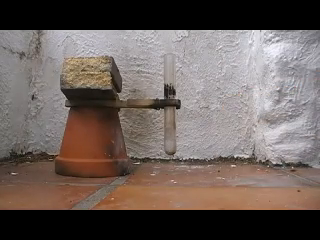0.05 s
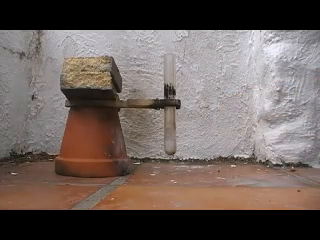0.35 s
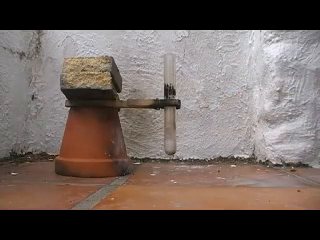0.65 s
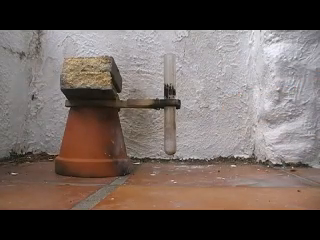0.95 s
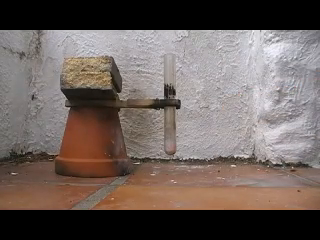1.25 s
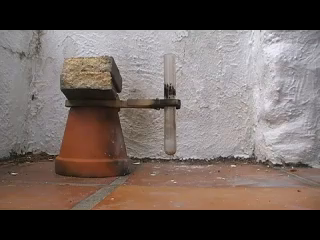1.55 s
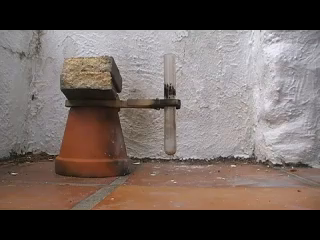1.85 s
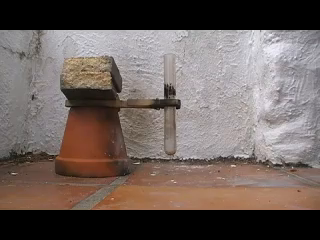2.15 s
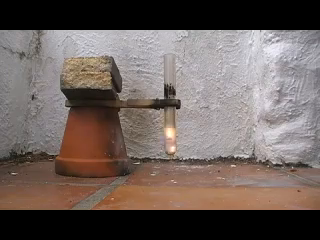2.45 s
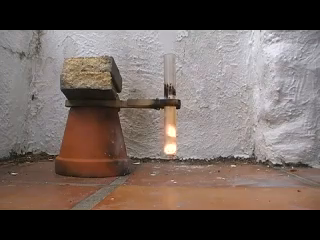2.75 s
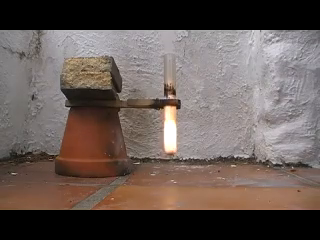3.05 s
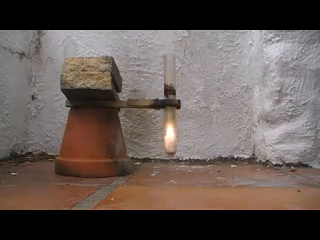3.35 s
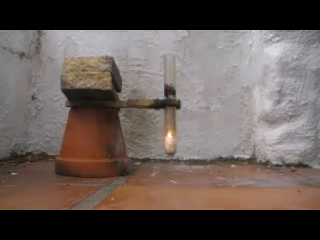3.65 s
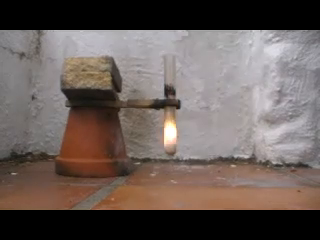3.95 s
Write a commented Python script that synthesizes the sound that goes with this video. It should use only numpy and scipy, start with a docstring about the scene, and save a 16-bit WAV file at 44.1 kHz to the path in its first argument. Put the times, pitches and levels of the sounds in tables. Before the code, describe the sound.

A chemical mixture fizzes in a glass tube from the start, with scattered dry pops and a hollow ringing tone. At about 2.3 seconds it ignites with sharp gusts and low thumps, becoming a hissing, crackling roar that climbs in pitch until about 3.2 seconds. It then sputters in rapid spits, dropping in pitch, up to the end at 4 seconds. The room hums very faintly underneath.

```python
"""Chemical fire in a glass tube

A mixture fizzes and pops in an upright tube, catches fire, roars, and sputters as it burns down.
All of it but the low thumps rings through the tube's air column, whose pitch rises with the heat
of the gas. A wall and a tiled floor stand close behind and below; the room hums faintly."""
import sys
import numpy as np
from scipy import signal
from scipy.fft import rfft, irfft
from scipy.io import wavfile
from scipy.ndimage import uniform_filter1d

SR = 44100
rng = np.random.default_rng(int(sys.argv[2]) if len(sys.argv) > 2 else 0)


def generate_wav(signal):
    """Clip the signal to [-1, 1] and save it as 16-bit WAV at the path in sys.argv[1]."""
    frames = np.transpose(np.atleast_2d(signal))
    scaled = np.clip(frames, -1, 1) * 32767
    pcm = np.round(scaled).astype(np.int16)
    wavfile.write(sys.argv[1], SR, pcm)


N = 176400  # 4 s


def amp(db):
    """Decibels to gain."""
    return 10 ** (np.asarray(db) / 20)


def unit_rms(x):
    """Scales to unit rms."""
    return x / np.sqrt(np.mean(x ** 2) + 1e-20)


def curve(rows, column=1):
    """One column of a time table, at every sample."""
    rows = np.array(rows)
    return np.interp(np.arange(N) / SR, rows[:, 0], rows[:, column])


def add(mix, start_s, sound):
    """Mixes a sound in at its start time."""
    part = mix[max(round(start_s * SR), 0):][:len(sound)]
    part += sound[:len(part)]


def causal_filter(x, db_at_hz, size=4096):
    """Minimum-phase filter: nothing rings ahead of an attack."""
    log_gain = np.log(amp(db_at_hz(abs(np.fft.fftfreq(size, 1 / SR)))))
    taps = np.fft.ifft(np.exp(np.conj(signal.hilbert(log_gain)))).real
    return signal.oaconvolve(x, taps[:size // 2])[:N]


def eq(x, points):
    """Shapes the tone by a table of freq_hz, gain_db."""
    hz, db = np.transpose(points)
    return causal_filter(x, lambda f: np.interp(np.log(f + 1), np.log(hz + 1), db))


def wander(rate_hz):
    """Smooth random motion of unit rms, up to about the given rate."""
    f = np.fft.rfftfreq(N, 1 / SR)
    band = np.exp(-(f / rate_hz) ** 2) * f / (f + rate_hz / 10)
    return unit_rms(irfft(rfft(rng.standard_normal(N)) * band, N))


# Tone of the room's hum: freq_hz, gain_db
HUM_EQ = [(20, -36), (60, 7), (85, -15), (160, 3), (2000, -28)]


def hum():
    """The low, steady noise of the room."""
    return unit_rms(eq(rng.standard_normal(N), HUM_EQ))


# Bands lost to the wall and floor: centre_hz, half_width_hz, gain_db
ECHO_NOTCHES = [(593, 140, -11.5), (1520, 46, -16.5), (3535, 180, -13), (4413, 75, -19.5),
                (6200, 41, -17.5), (7540, 440, -8.5)]


def wall_and_floor(x):
    """Close echoes cancel narrow bands of the direct sound."""
    return causal_filter(x, lambda f: sum(db / (1 + ((f - hz) / half_width) ** 2)
                                          for hz, half_width, db in ECHO_NOTCHES))


def echoes(x, t60_s):
    """Dense reflections that start after 2 ms and die away."""
    t = np.arange(SR // 2) / SR
    taps = rng.standard_normal(len(t)) * amp(-60 * t / t60_s) * (t > .002)
    return signal.oaconvolve(x, taps / np.linalg.norm(taps))[:N]


# Early echoes, mostly treble: freq_hz, gain_db
EARLY_EQ = [(1000, -12), (3000, -10), (8000, -2.5)]
# Echoes that differ between the ears: freq_hz, gain_db
SIDE_EQ = [(900, -16.5), (4500, -9.5), (6500, -8), (7500, -12)]


def room(x, early_t60_s=.036, tail_t60_s=.22):
    """Bright reflections and a short, faint tail; side echoes and a trace of hum give stereo width."""
    mid = x + eq(echoes(x, early_t60_s), EARLY_EQ) + amp(-27) * echoes(x, tail_t60_s)
    side = eq(echoes(x, early_t60_s), SIDE_EQ) + amp(-64) * hum()
    return np.array([mid + side, mid - side])


# Pitch of the air column, rising with heat: time_s, first_resonance_hz, second_resonance_hz
AIR_COLUMN = [(0, 810.6, 2673), (2.28, 828.4, 2700), (2.42, 856, 2840), (2.62, 944, 3004),
              (2.9, 1045, 3190), (3.15, 1068, 3250), (3.33, 1042, 3200), (3.54, 881, 2900),
              (3.78, 836.5, 2830), (4.0, 886, 2970)]
# The second resonance is broad over the foaming melt, narrower in the flame, hollow as it dies.
MELT_WIDTH_HZ, FLAME_WIDTH_HZ, DYING_WIDTH_HZ = 330, 215, 150


def tube(x, second_width_hz, first_width_hz, second_db, leak_db):
    """The air column, closed at the bottom, rings in three resonances; a little sound leaks past."""
    second_hz = curve(AIR_COLUMN, column=2)
    first = resonate(x, curve(AIR_COLUMN), first_width_hz)
    second = resonate(x, second_hz, second_width_hz)
    third = resonate(x, 1.665 * second_hz, width_hz=340)
    return first + amp(second_db) * second + amp(-25.5) * third + amp(leak_db) * x


def resonate(x, pitch_hz, width_hz):
    """A resonance of gain 1 that glides along a pitch curve."""
    turn = np.exp(2j * np.pi * np.cumsum(pitch_hz) / SR)
    pole = np.exp(-np.pi * width_hz / SR)
    return 2 * (turn * signal.lfilter([1 - pole], [1, -pole], x / turn + 1e-18)).real


# Envelope of the melt's fizz: time_s, level_db
FIZZ_LEVEL = [(0, -5), (.22, -3.5), (.85, -6.5), (1.03, -7.5), (1.11, -4.5), (1.18, -8), (1.25, -2),
              (1.38, -6.5), (2.16, -4), (2.28, -10), (2.85, 2.5), (3.55, -38), (3.72, -41), (4.0, -22)]
# Tone of the fizz: freq_hz, gain_db
FIZZ_EQ = [(450, 1.5), (820, 3.5), (4200, 1.5), (5500, 0.5), (6700, 4), (7400, -3), (9700, -4),
           (11000, -12.5), (12800, -27)]


def fizz(swell_db=2, swell_hz=25, grain_db=3, grain_hz=500):
    """Countless tiny bubbles, in uneven waves."""
    swell = swell_db * np.tanh(wander(swell_hz))
    grain = grain_db * wander(grain_hz) - grain_db / 2
    bubbles = eq(amp(curve(FIZZ_LEVEL) + swell + grain) * rng.standard_normal(N), FIZZ_EQ)
    return tube(bubbles, MELT_WIDTH_HZ, first_width_hz=44.6, second_db=-16.5, leak_db=-28.5)


def burst(level_db, soft_ms, spray_db, spray_ms, lead_ms):
    """One push of gas, duller the softer it is, in a spray of noise that starts just ahead of it."""
    ms = np.arange(2048) * 1000 / SR
    push_ms = np.maximum(ms - lead_ms, 0)
    push = push_ms * np.exp(-push_ms / soft_ms)
    spray = ms / spray_ms * np.exp(1 - ms / spray_ms) * rng.standard_normal(len(ms))
    return amp(spray_db) * spray - amp(level_db) * push / (push.sum() * ms[1])


# Tone of the pops, shared by spits, flares and crackle: freq_hz, gain_db
BURST_EQ = [(50, -25), (150, -7), (850, 5.5), (2000, 6), (6500, 2), (9500, -5.5), (12500, -25.5)]
# Bursting bubbles: start_s, level_db, softness_ms, spray_db
BUBBLE_POPS = [(.3714, 7, 0.15, -2.5), (0.9718, 1.5, 0.056, 8), (1.2932, 6, 0.13, 0), (1.4057, 0, 0.13, 9),
               (1.4095, 1, 0.051, -8), (1.5332, 2.5, 0.071, 1.5), (1.6402, -2.5, 0.047, -2),
               (1.689, 6.5, 0.04, 12), (1.8717, 5.5, 0.048, 5.5), (2.236, -3, 0.012, 8.5),
               (2.2511, -2.5, 0.022, 6.5), (2.299, 0.5, 0.055, -0.5), (2.325, -4, 0.087, -1.5),
               (3.022, 10, 0.12, 6), (3.955, 4, 0.017, 7)]


def pops(low_cut_hz=320):
    """Large bubbles burst with a dry snap, most of them before the melt lights."""
    gas = np.zeros(N)
    for start_s, level_db, soft_ms, spray_db in BUBBLE_POPS:
        add(gas, start_s, burst(level_db, soft_ms, spray_db, spray_ms=2.2, lead_ms=.31))
    gas = signal.lfilter(*signal.butter(2, low_cut_hz, "high", fs=SR), gas)
    return tube(eq(gas, BURST_EQ), MELT_WIDTH_HZ, first_width_hz=79.5, second_db=-14, leak_db=-26.5)


# Envelope of the chain of weak spits: time_s, level_db
SPUTTER_LEVEL = [(3.2, -5.5), (3.42, -4), (3.62, 2), (3.71, -18), (4.0, 0)]
# Accents of the dying flame: start_s, level_db, softness_ms
STRONG_SPITS = [(3.2358, 3, 0.072), (3.3321, -2, 0.037), (3.3539, 4, 0.064), (3.4557, -5.5, 0.019),
                (3.473, 1, 0.025), (3.633, -4, 0.027), (3.65, 8, 0.11), (3.719, 5, 0.1),
                (3.7511, 10.5, 0.15), (3.7739, 4.5, 0.064), (3.806, 0, 0.028), (3.837, -0.5, 0.022),
                (3.8873, 11.5, 0.075), (3.9172, 0, 0.036), (3.9786, 4, 0.047)]


def sputter(count=110, rate_hz=108, jitter=.16, spread_db=1.4, weak_soft_ms=.043, clear_s=.0055):
    """The flame burns down in a fast, nearly regular chain of spits; strong ones replace weak ones."""
    gas = np.zeros(N)
    gap, size = rng.standard_normal((count, 2)).T
    times = SPUTTER_LEVEL[0][0] + np.cumsum(np.exp(jitter * gap)) / rate_hz
    levels = np.interp(times, *np.transpose(SPUTTER_LEVEL)) + spread_db * size
    strong_times = np.array(STRONG_SPITS)[:, 0]
    weak_spits = [(s, db, weak_soft_ms) for s, db in zip(times, levels)
                  if abs(strong_times - s).min() > clear_s]
    for start_s, level_db, soft_ms in weak_spits + list(STRONG_SPITS):
        spray_db = level_db + 6 - 20 * np.log10(soft_ms / weak_soft_ms)  # soft spits spray less
        add(gas, start_s, burst(level_db, soft_ms, spray_db, spray_ms=.9, lead_ms=.49))
    return tube(eq(gas, BURST_EQ), DYING_WIDTH_HZ, first_width_hz=42, second_db=-11, leak_db=-37)


# Gusts before and after the mixture lights: start_s, level_db, relative_thump_db
GAS_FLARES = [(.505, -6, -5), (1.795, -3.5, 5.5), (2.352, -0.5, 6.5), (2.428, 0.5, 5), (2.435, 13, -3),
              (2.454, 8, -5), (2.491, 7, 12), (2.554, 4, -21), (2.676, 1.5, -2.5), (2.741, 10, -8),
              (2.802, 2.5, 0), (2.855, 4, -4), (3.286, 4, -15)]
# Tone of their thumps: freq_hz, gain_db
THUMP_EQ = [(70, -26), (150, 1.5), (380, 6), (1500, -43)]


def flares(thump_rise_ms=3.5):
    """Sudden gusts of gas ring the tube, each with a low thump underneath."""
    gas, thump_envelope = np.zeros(N), np.zeros(N)
    ms = np.arange(SR // 10) * 1000 / SR
    swell = ms / thump_rise_ms * np.exp(1 - ms / thump_rise_ms)
    for start_s, db, thump_db in GAS_FLARES:
        add(gas, start_s, burst(db, soft_ms=.099, spray_db=db + 3, spray_ms=1.77, lead_ms=1.845))
        add(thump_envelope, start_s, amp(thump_db) * swell)
    thumps = amp(-31) * thump_envelope * unit_rms(eq(rng.standard_normal(N), THUMP_EQ))
    gusts = tube(eq(gas, BURST_EQ), FLAME_WIDTH_HZ, first_width_hz=88, second_db=-10, leak_db=-48)
    return gusts + thumps


# Envelope of the flame: time_s, level_db
ROAR_LEVEL = [(2.2, -51), (2.33, 1.5), (2.5, 4), (2.55, 8.5), (2.7, 5.5), (3.17, 7), (3.35, 2.5),
              (3.64, 2.5), (3.72, -3.5), (3.82, 2), (4.0, 3)]
# Tone of its turbulent gas: freq_hz, gain_db
ROAR_EQ = [(70, -24), (130, 3), (620, 1.5), (1050, 4.5), (2000, -0.5), (3100, -4.5), (4200, -16),
           (5700, -4.5), (7400, -10), (9700, -11), (12000, -40)]


def roar(flutter_db=2.5, flutter_hz=160, body_hz=500, dulling=.6, crackles_per_s=130):
    """Turbulent gas from the fluttering flame, shot through with the sharp crackle of burning grains."""
    level_db = curve(ROAR_LEVEL)
    flutter = amp(flutter_db * wander(flutter_hz) - flutter_db / 2)
    gas = eq(flutter * rng.standard_normal(N), ROAR_EQ)
    body = signal.lfilter(*signal.butter(1, body_hz, fs=SR), gas)
    brightness = amp(dulling * (level_db - level_db.max()))  # a weaker flame is duller
    gas = body + brightness * (gas - body)
    grains = rng.random(N) < crackles_per_s / SR
    crackle = eq(grains * amp(5 + 14 * rng.random(N)), BURST_EQ)
    flame = amp(level_db) * (gas - crackle)
    return tube(flame, FLAME_WIDTH_HZ, first_width_hz=81, second_db=-10.5, leak_db=-35.5)


def scene():
    """The tube near the wall and floor, over the hum of the room."""
    reaction = fizz() + roar() + pops() + flares() + sputter()
    return room(wall_and_floor(reaction) + amp(-50) * hum())


def record(dry, threshold_db=-7.5, strength=.98, release_db_per_s=75.5, high_cut_hz=12900):
    """A fast limiter ducks after each loud pop; peaks are rounded off and the top treble is cut."""
    power_db = 10 * np.log10(abs(uniform_filter1d((dry ** 2).mean(0), size=130)) + 1e-12)
    release_db = np.arange(N) / SR * release_db_per_s
    held_db = np.maximum.accumulate(power_db + release_db) - release_db
    over_db = np.maximum(held_db - threshold_db, 0)
    limited = dry / amp(strength * uniform_filter1d(over_db, size=60))
    rounded = limited / (1 + limited ** 6) ** (1 / 6)
    high_cut = signal.firwin(255, high_cut_hz, window=("kaiser", 9), fs=SR)
    return signal.oaconvolve(rounded, high_cut[None], "same")


dry = scene()
out = record(dry)
generate_wav(out)
```